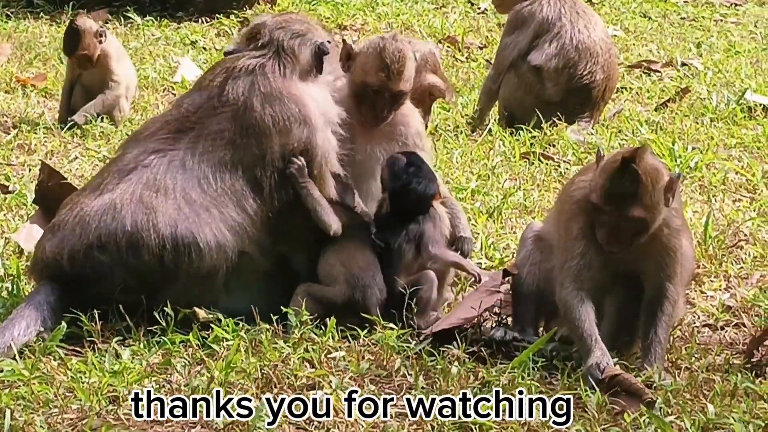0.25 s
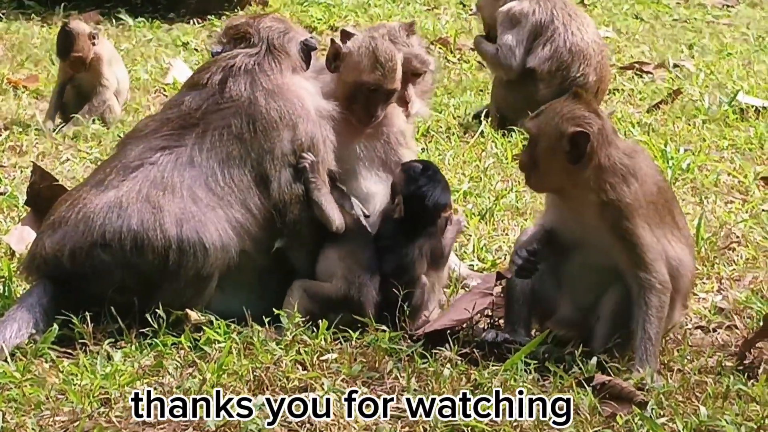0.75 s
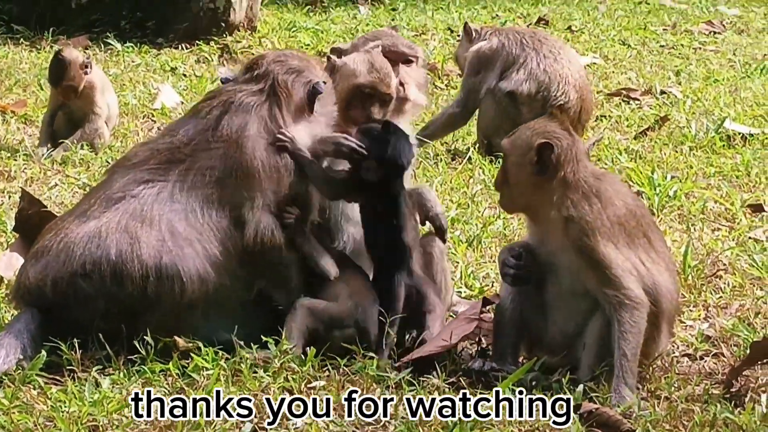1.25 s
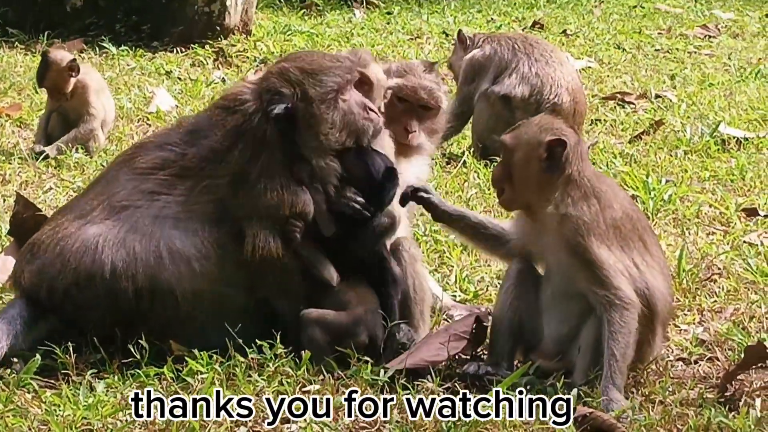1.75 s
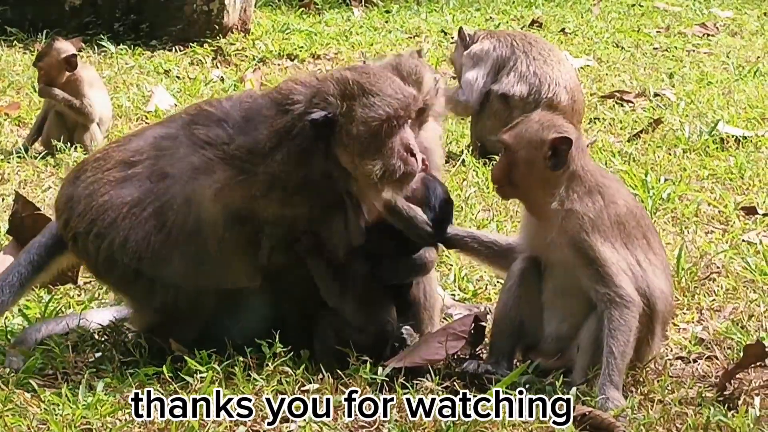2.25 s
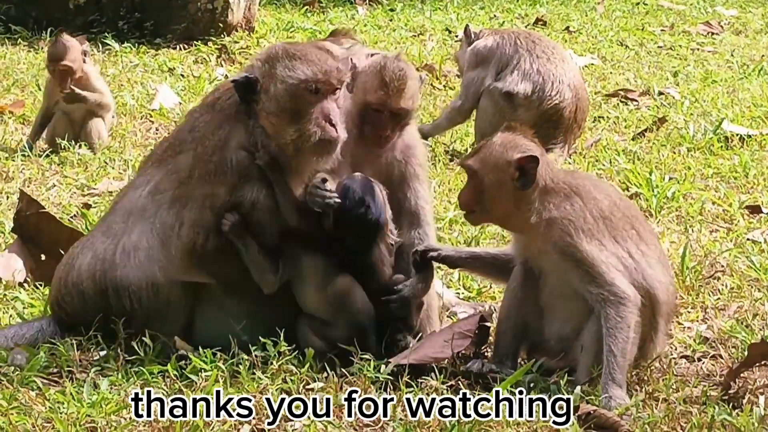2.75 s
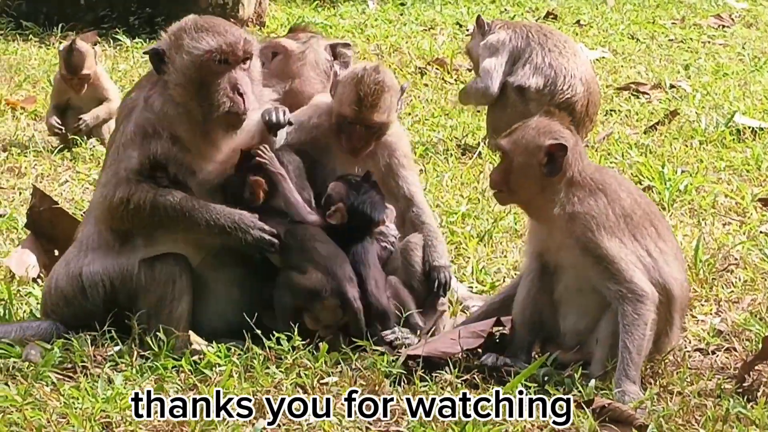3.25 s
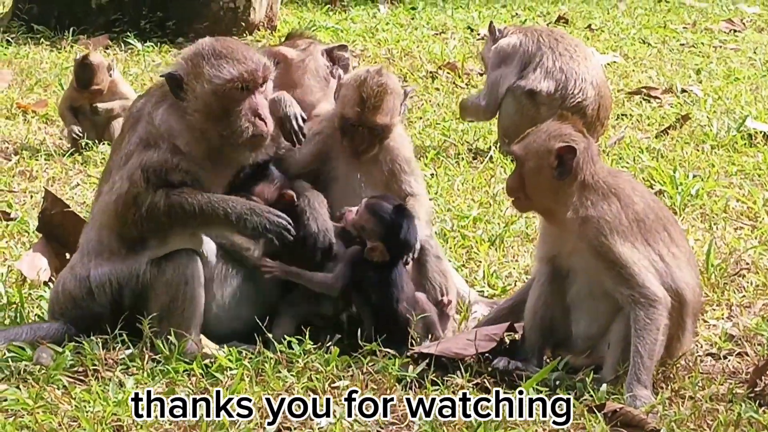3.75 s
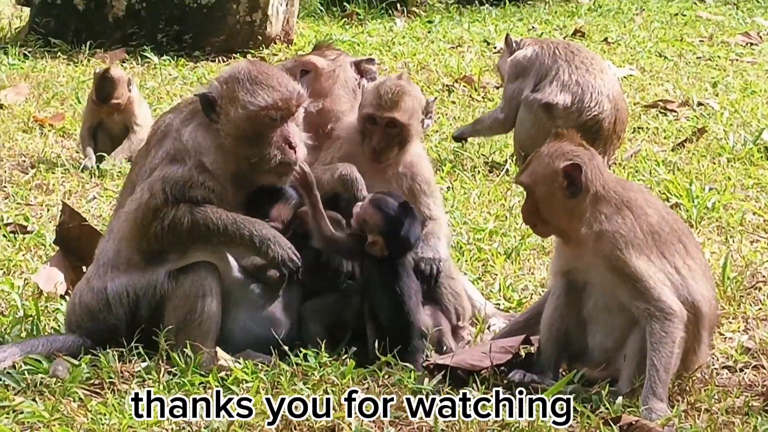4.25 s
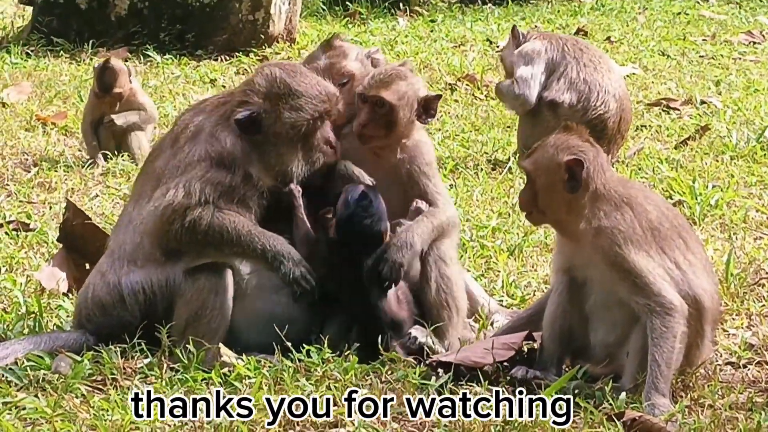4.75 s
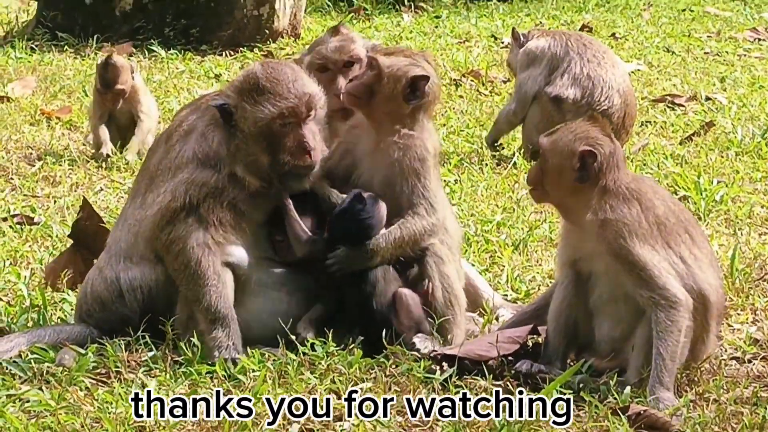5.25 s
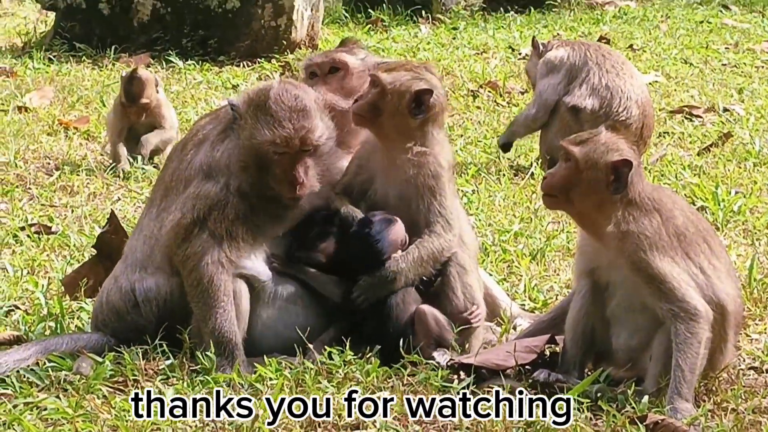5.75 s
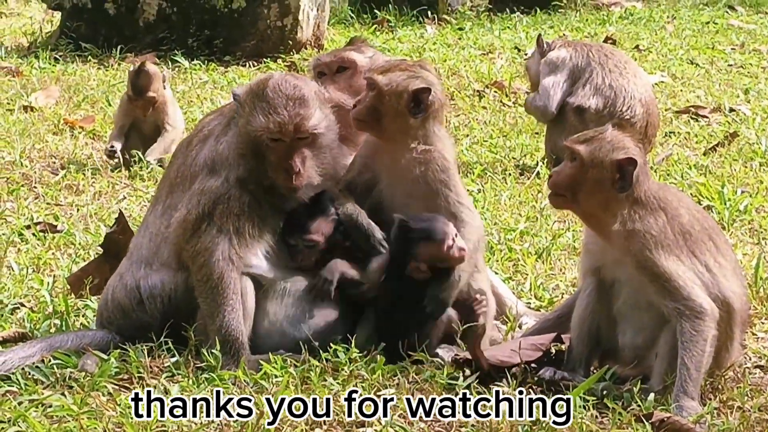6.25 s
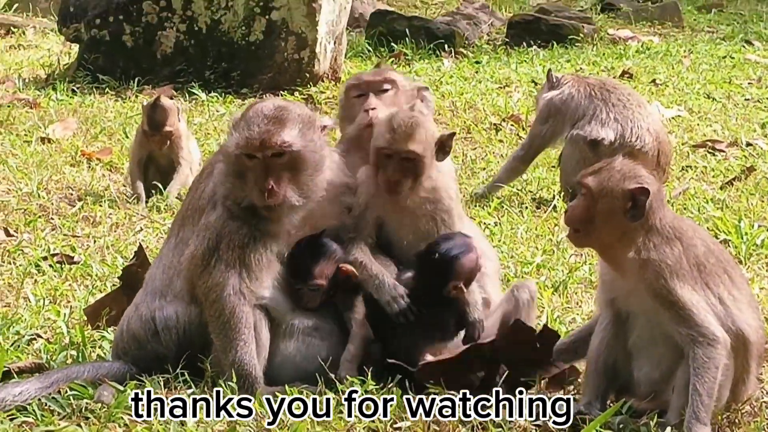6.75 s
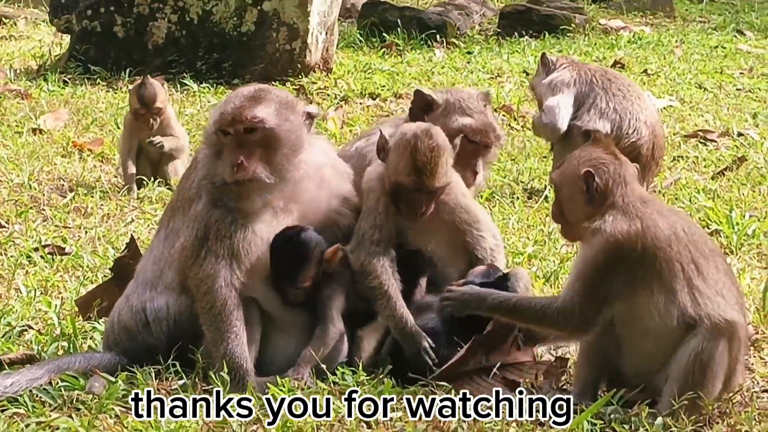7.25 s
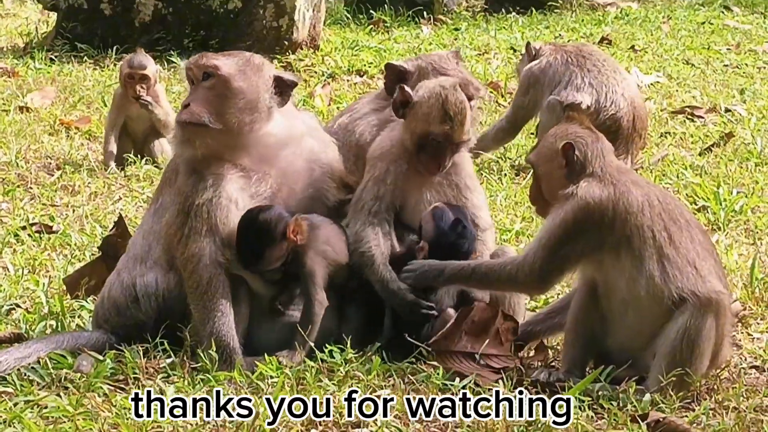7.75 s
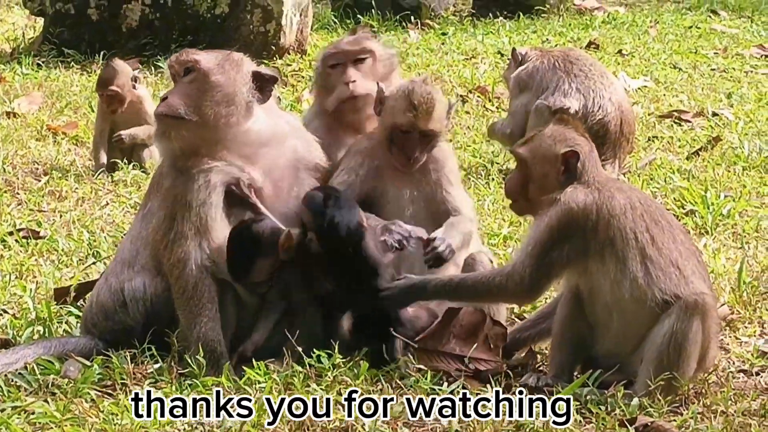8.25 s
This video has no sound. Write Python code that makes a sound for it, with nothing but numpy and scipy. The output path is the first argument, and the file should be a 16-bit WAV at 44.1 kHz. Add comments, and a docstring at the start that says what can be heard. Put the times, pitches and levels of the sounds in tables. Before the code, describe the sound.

Shrill infant monkey chirps and one rasping scream pierce an echoing flurry of bird squawks and chatter, over thin insect drone and low rumble.

```python
"""Shrill infant macaque chirps and one longer rasping scream, over insect drone and low traffic rumble.
Birds squawk, whistle and chatter in echoing trees; lips smack, dry leaves tick and soft bumps land.
The infant's voice mixes vocal-fold tones with rasping noise; the birds are overtones shaped by a beak.
Contact sounds are noise bursts through one resonance; the background is filtered, swaying noise."""
import sys
import numpy as np
from scipy import signal
from scipy.fft import rfft, irfft, next_fast_len
from scipy.io import wavfile

SR = 44100
rng = np.random.default_rng(int(sys.argv[2]) if len(sys.argv) > 2 else 0)


def materialize(psi):
    """Save the field psi as 16-bit PCM at rate SR to the path in sys.argv[1].

    A 1-D psi becomes a single channel; in a 2-D psi each row is a channel.
    """
    bounded = np.clip(np.atleast_2d(psi).T, -1, 1)
    quanta = np.round(bounded * 32767).astype(np.int16)
    wavfile.write(sys.argv[1], SR, quanta)


N = 374836
T = np.arange(N) / SR  # time in seconds
TOP_HZ = 15850  # upper limit of the sound
SECOND_ROUGH = 0.4  # roughness of the infant's second vocal-fold tone

# gain of the right channel for the infant and the taps: [f/Hz, level/dB]
SHADE = [(100, 1.5), (500, -13.5), (2500, -4), (4500, -9), (8000, -5), (9800, -23.5), (11500, -24),
         (14500, -20)]
# the scream, breaking into a whistle an octave up:
# [t/s, pitch f/Hz, tone level/dB, rasp level/dB, second tone level/dB]
SCREAM = [ (6.593, 3400, -40, -32, -55), (6.603, 3890, -18, -26, -50), (6.612, 4020, -27, -31, -48),
          (6.612, 3630, -9.5, -27.5, -42), (6.629, 3600, -11, -17, -32), (6.649, 3330, -29, -20.5, -35),
          (6.667, 3590, -13, -13, -14), (6.683, 3290, -20, -17, -38), (6.706, 3460, -34.5, -30, -29),
          (6.727, 3916, -20, -30, -48), (6.742, 3910, -31, -23.5, -42), (6.777, 3990, -32, -21.5, -40),
          (6.821, 4206, -50, -20, -24), (6.854, 9570, -28, -24, -39), (6.888, 8350, -33, -29.5, -50),
          (6.901, 9040, -24.5, -26, -51), (6.923, 8700, -24, -32.5, -45), (6.957, 8900, -32, -39, -44),
          (6.998, 7940, -22, -29.5, -36.5), (7.023, 7660, -39, -42, -37), (7.048, 7450, -46, -32.5, -61),
          (7.063, 7300, -56, -44, -64), ]


def undb(db):
    """Turn decibels into gain."""
    return 10 ** (np.asarray(db) / 20)


def unit(x):
    """Scale to an rms (average strength) of 1."""
    return x / np.sqrt(np.mean(x ** 2) + 1e-20)


def gain_at(hz, points):
    """Read the gain at hz from (Hz, dB) points joined on a log-frequency axis."""
    f, db = np.transpose(points)
    return undb(np.interp(np.log(hz + 1), np.log(f), db))


def colour(x, points):
    """Filter x by a spectrum of (Hz, dB) points."""
    length = x.shape[-1]
    size = next_fast_len(length)
    gain = gain_at(np.fft.rfftfreq(size, 1 / SR), points)
    return irfft(rfft(x, size) * gain, size)[..., :length]


def resonate(x, hz, width):
    """Ring a resonance, applied twice so that its skirts are steep."""
    b, a = signal.iirpeak(min(hz, SR * .45), hz / width, fs=SR)
    once = signal.lfilter(b, a, x + 1e-18)
    return signal.lfilter(b, a, once)


def walk(t, rate):
    """Join random levels by straight lines, rate of them a second."""
    u = (t - t[0]) * rate
    count = int(u[-1]) + 2
    levels = rng.standard_normal(len(t) + 2)[:count]
    return 1.22 * np.interp(u, np.arange(count), levels)  # 1.22 makes up for the smoothing by the lines


def clock(length):
    """Give the sample times over length seconds."""
    return np.arange(int(length * SR)) / SR


def add(track, s, x):
    """Mix x into the track at s seconds."""
    i = int(np.clip(s * SR, 0, N - 1))
    track[i:i + len(x)] += x[:N - i]


def stereo(x, shade, lag=0):
    """Filter the right channel by shade and delay the left one by lag samples."""
    left = np.pad(x, (lag, 0))[:N]
    return np.array([left, colour(x, shade)])


def scatter(x, t60, onset):
    """Diffuse echoes, different in each channel: noise that builds up, then falls 60 dB in t60 seconds."""
    t = T[:int(1.6 * SR)]
    tail = rng.standard_normal((2, len(t))) * undb(-60 * t / t60) * (1 - np.exp(-t / onset))
    tail /= np.sqrt(np.sum(tail ** 2, axis=1, keepdims=True))
    return signal.fftconvolve(x[None], tail, axes=1)[:, :N]


def arch(u, start, top, end, top_at):
    """Curve from start to top and on to end as u goes from 0 to 1."""
    before = np.clip(1 - u / top_at, 0, 1) ** 2
    after = np.clip((u - top_at) / (1 - top_at), 0, 1) ** 2
    return top + (start - top) * before + (end - top) * after


def folds(t, pitch, rough, bursts, jitter=.085, jitter_hz=2000, flutter=.45, flutter_hz=650):
    """Tight vocal folds whistle through the throat; roughness scatters their pitch and level."""
    # resonances of the infant's throat: [f/Hz, relative level/dB]
    throat = [(2400, -27.5), (3700, -16), (4700, 22.5), (5500, 19), (6500, -5), (7500, -12), (8600, -16),
              (9400, -2), (10700, 13.5), (11800, 5), (13000, -7), (14500, -3.5), (16500, -20)]
    shake = walk(t, jitter_hz) + walk(t, flutter_hz)
    phase = 2 * np.pi * np.cumsum(pitch * (1 + jitter * rough * shake)) / SR
    k = np.arange(1, 7)[:, None]  # overtone numbers
    below_top = np.clip((SR * .42 - k * pitch) / 1500, 0, 1)
    partials = gain_at(k * pitch, throat) * below_top
    tone = np.sum(partials * np.sin(k * phase), 0) / np.sqrt(np.sum(partials ** 2, 0) / 2)
    return tone * np.exp(flutter * rough * bursts - (flutter * rough) ** 2)


def cry(t, pitch, tone_db, rasp_db, least_rough, chaos_share=1, burst_hz=650, edge=.002):
    """Tone and rasp together: the more the air rasps, the more chaotic the folds."""
    # spectrum of the rasp: [f/Hz, relative level/dB]
    rasp_colour = [(1200, -10.5), (2000, -17.5), (2900, -13), (3800, -1.5), (4900, 0), (6500, -6.5),
                   (8800, -3), (10300, 9.5), (11200, 6), (12000, 4.5), (13500, 1), (15700, -1.5)]
    chaos_db, chaos_spread_db = 7.5, 10.5  # rasp over tone at which chaos is well under way; how gradually
    patchy_db, patchy_hz = 6, 110  # flicker of each narrow band
    shudder_db, shudder_hz = 1.5, 220  # the voice shakes in quick uneven bursts
    rasp_flutter = 0.15  # the rasp flutters as a whole

    excess = (chaos_db + tone_db - rasp_db) / chaos_spread_db
    rough = np.clip(least_rough + chaos_share / (2 + np.exp(excess)), 0, 1)
    bursts = walk(t, burst_hz)
    # chaotic folds dwell briefly on one frequency after another
    chaos = np.zeros(len(t))
    for hz in np.arange(1500, 16500, 400):
        band = resonate(rng.standard_normal(len(t)), hz, 630)
        chaos += band * undb(patchy_db * walk(t, patchy_hz))
    rasp = unit(colour(chaos, rasp_colour) * np.exp(rasp_flutter * bursts))
    shudder = unit(undb(shudder_db * np.minimum(walk(t, shudder_hz), .5)))
    fade = np.clip(np.minimum(t, t[-1] - t) / edge, 0, 1) * shudder
    return fade * (folds(t, pitch, rough, bursts) * undb(tone_db) + rasp * undb(rasp_db))


def chirp(length, top_hz, landing_hz, tone_db, rasp_db, landing_db, second_db, second_hz=4750):
    """One arch of pitch: clear at first, then rasping over a second tone, with a flare as it lands."""
    start, top_at, least_rough = .87, 0.25, 0.1  # share of the top pitch; share of the length; roughness
    attack_s, landing_s, release_db_per_s = 0.0059, 0.0026, 1700
    # the tone gives way to rasp, which tops at this share of the length
    tone_fade_db, rasp_growth_db, rasp_ease_db, rasp_top_at = 7, 16.5, 5.5, 0.56

    t = clock(length + .02)  # leaves room for the release
    u = np.minimum(t / length, 1)
    pitch = arch(u, start * top_hz, top_hz, landing_hz, top_at)
    attack_db = 20 * np.log10(1 - np.exp(-(t + 1 / SR) / attack_s))
    effort_db = attack_db - release_db_per_s * np.maximum(t - length, 0)
    flare = undb(landing_db) * np.exp(-((t - length) / landing_s) ** 2)
    tone = undb(tone_db + effort_db - tone_fade_db * u) + flare
    rasp = rasp_db + effort_db + arch(u, -rasp_growth_db, 0, -rasp_ease_db, rasp_top_at)
    # the other vocal fold sounds a pitch of its own
    second = folds(t, np.full(len(t), 1. * second_hz), SECOND_ROUGH, walk(t, 740))
    second *= undb(second_db + effort_db) * u
    return cry(t, pitch, 20 * np.log10(tone), rasp, least_rough) + second


def scream():
    """A shriek dissolves into rasp and ends as a sinking whistle that beats with a second tone beneath."""
    coupling_db = 1.5  # strength of the tones made by the two folds together
    s, *columns = np.transpose(SCREAM)
    s = np.sort(s) - s[0]
    t = clock(s[-1])
    pitch, tone_db, rasp_db, second_db = (np.interp(t, s, c) for c in columns)
    # the other vocal fold wavers around 5180 Hz
    second_hz = 5180 * (1 + 0.0263 * walk(t, 33))
    second = folds(t, second_hz, SECOND_ROUGH, walk(t, 370))
    # in the whistle the two folds add combination tones
    whistling = np.clip((pitch - 6500) / 1000, 0, 1)
    beats = np.zeros(len(t))
    for hz in (2 * pitch - second_hz, pitch + second_hz):
        beats += np.sin(2 * np.pi * np.cumsum(hz * (1 + 0.019 * walk(t, 1200))) / SR)
    beats *= whistling * undb(coupling_db + (tone_db + second_db) / 2)
    return cry(t, pitch, tone_db, rasp_db, 0, chaos_share=0.44) + undb(second_db) * second + beats


def infant(near_db=-18, far_db=-28):
    """The cries, with a quick splash off the ground and the group, and a faint tail from the trees."""
    # chirps: [t/s, length/s, top f/Hz, landing f/Hz, tone level/dB, rasp level/dB, landing level/dB,
    # second tone level/dB]; levels before the chirp's own swells and fades
    chirps = [ (0, .008, 5250, 4710, -13, -24, -16, -57), (.017, 0.026, 2386, 2283, -14, -33.5, -45, -52),
              (1.199, .018, 6180, 4120, -42.5, -26.5, -28.5, -37),
              (4.221, 0.013, 5840, 3450, -34, -57, -46, -67),
              (4.394, .018, 6300, 4290, -25, -16.5, -9.5, -28),
              (4.57, 0.074, 8800, 4500, -20.5, -23.5, -26, -40.5),
              (6.44, .044, 7540, 5010, -21.5, -20, -20, -30.5),
              (8.191, .021, 6730, 3994, -24, -29, -29, -29),
              (8.366, 0.048, 7350, 4440, -22.5, -29.5, -51, -35.5), ]
    # the cries carry little bass: [f/Hz, level/dB]
    low_cut = [(600, -24), (2000, 0)]
    x = np.zeros(N)
    for s, *shape in chirps:
        add(x, s, chirp(*shape))
    add(x, SCREAM[0][0], scream())
    x = colour(x, low_cut)
    dull = colour(x, [(5000, 6), (9000, 9), (15000, -15.5)])
    splash = scatter(x, t60=0.079, onset=0.0068) * undb([[near_db], [near_db + 7.5]])
    return stereo(x, SHADE) + splash + undb(far_db) * scatter(dull, t60=0.64, onset=0.0061)


def outdoors(rumble_side_db=-15, air_sway_db=0.75, insect_flicker_db=2.0):
    """Traffic rumble nearly alike in both channels, a soft wash of air and flickering insect drones."""
    # spectrum of the rumble: [f/Hz, relative level/dB]
    rumble = [(15, -49.5), (25, -26), (73, -1.5), (108, 3), (157, -2.5), (210, -12), (261, -18.5),
              (404, -47.5), (450, -40.5), (580, -58), (990, -120)]
    # slow swell of the rumble: [t/s, level/dB]
    rumble_db = [(0.0, -56.5), (3.1, -52.5), (6.55, -57.5), (8.5, -52)]
    # wash of air in the trees: [f/Hz, relative level/dB]
    air_colour = [(150, -14), (300, -6), (600, -2.5), (1200, 1), (2000, -0.5), (3500, -6), (5500, -14),
                  (7600, -10.5), (8800, -27.5), (12000, -25), (16000, -18)]
    # insect drones: [f/Hz, width/Hz, level/dB]
    insects = [(6725, 270, -62.5), (10520, 840, -80)]

    mid, side = (unit(colour(rng.standard_normal(N), rumble)) for _ in range(2))
    rumble_swell = undb(np.interp(T, *np.transpose(rumble_db)))
    out = rumble_swell * (mid + undb(rumble_side_db) * side * np.array([[1], [-1]]))
    # part of the air is the same in both channels
    shared = colour(rng.standard_normal(N), [(300, 7.5), (1200, -12.5)])
    air = rng.standard_normal((2, N)) + shared
    out += unit(colour(air, air_colour)) * undb(-62.5 + air_sway_db * walk(T, 4.3))
    for hz, width, db in insects:
        drone = unit(resonate(rng.standard_normal((2, N)), hz, width))
        out += drone * undb(db + insect_flicker_db * walk(T, 25))
    return out


def taps(echo_db=-19):
    """Short bursts of contact, each a fading noise that rings one resonance."""
    # lip smacks, leaf ticks and soft bumps: [t/s, centre f/Hz, width/Hz, decay/s, peak level/dB]
    contacts = [ (.06, 2820, 250, 0.016, -38), (0.068, 1610, 250, 0.068, -43.5),
                (.072, 505, 139, 0.018, -46.5), (.078, 3900, 596, 0.0045, -28.5),
                (.062, 12100, 5030, 0.015, -27), (0.099, 1208, 99, 0.0026, -29.5),
                (0.192, 340, 106, 0.00066, -34.5), (0.992, 12200, 1400, 0.0064, -45),
                (1.076, 2380, 940, 0.0074, -30), (1.148, 90, 24, 0.061, -37.5),
                (1.215, 504, 90, 0.021, -47), (1.996, 12040, 3000, 0.0042, -41),
                (3.454, 12700, 2930, 0.021, -43.5), (4.408, 526, 98, 0.004, -27.5),
                (5.268, 380, 288, 0.0013, -24.5), (5.28, 700, 201, 0.029, -41),
                (5.298, 13100, 6560, 0.00028, -17), (7.453, 8300, 3000, 0.0073, -39.5),
                (7.569, 64, 30.3, 0.022, -42.5), (8.258, 94.6, 25.3, 0.023, -36.5), ]
    x, t = np.zeros(N), T[:SR // 6]
    for s, hz, width, decay, db in contacts:
        tap = resonate(rng.standard_normal(len(t)) * np.exp(-t / decay), hz, width)
        add(x, s, undb(db) * tap / np.abs(tap).max())
    return stereo(x, SHADE) + undb(echo_db) * scatter(x, t60=0.12, onset=0.011)


def swell(t):
    """A bird's note fades in and out, over 18 ms or a quarter of a shorter note."""
    return np.clip(np.minimum(t, t[-1] - t) / min(t[-1] / 4, 0.018), 0, 1)


def overtones(t, pitch, rough, beak_hz, jitter=0.054, jitter_hz=600, beak_width=650,
              rough_width=1900, soft_db=-19, waver=0.0079):
    """One side of the syrinx (voice box); the beak favours a few overtones, more in a harsh call."""
    # resonances of the birds' throats: [f/Hz, relative level/dB]
    throat = [(900, -11.5), (1150, 10), (1400, -3.5), (1750, 2.5), (2050, 6), (2420, 6.5), (2980, -0.5),
              (3450, 12.5), (4350, 2.5), (5300, -1), (6200, -9), (8000, -9.5), (11000, -26.5)]
    flutter_db = 3.4  # flutter of each overtone
    shake = jitter * rough * walk(t, jitter_hz) + waver * walk(t, 160)
    phase = 2 * np.pi * np.cumsum(pitch * (1 + shake)) / SR
    k = np.arange(1, 11)[:, None]  # overtone numbers
    hz = k * pitch
    beak = 1 + ((hz - beak_hz) / (beak_width + rough_width * rough)) ** 2
    # pure calls lose the overtones well above the beak resonance
    above = np.clip((k * pitch.max() - beak_hz - 400) / 400, 0, 1)
    soft = soft_db * above * max(1 - rough / 0.26, 0)
    # paths through the leaves make each overtone swell and fade on its own
    fading = flutter_db * np.array([walk(t, 60) for _ in k])
    partials = gain_at(hz, throat) / beak * (hz < TOP_HZ) * undb(soft + fading)
    return np.sum(partials * np.sin(k * phase), 0) * np.exp(.5 * rough * walk(t, 400))


def syrinx(t, pitch, rough, beak_hz, second=0.46, soft_db=-22):
    """A bird's note at unit level; roughness makes it stray and brings in a second gliding voice."""
    wander, wander_hz = .04, 34  # share of the pitch at full roughness; turns a second
    # the other side of the syrinx has a glide of its own
    other = pitch * np.linspace(*rng.uniform(.8, 1.15, 2), len(t))
    voices = []
    for hz in (pitch, other):
        strayed = hz * (1 + wander * rough * walk(t, wander_hz))
        voices.append(overtones(t, strayed, rough, beak_hz, soft_db=soft_db))
    first, joined = voices
    return unit((first + min(second * rough, .7) * joined) * swell(t))


def slide(length, hz, glide, db, rough, beak_hz):
    """A note that glides straight through its pitch."""
    t = clock(length)
    return syrinx(t, hz * (1 + glide * (t / length - .5)), rough, beak_hz) * undb(db)


def squawk(length, top_hz, drop, db, rough, beak_hz):
    """A clear call that swoops up, holds, then drops as the beak closes."""
    swoop_per_s = 0.75  # longer calls start lower
    top_at, curve = 0.283, 2.9  # share of the length at the top; how late the sag comes
    rise_db, fade_db = 12.5, 13  # the call grows as it swoops up, then fades
    beak_close = 2.4  # the beak resonance sinks this many times as far as the pitch
    t = clock(length)
    u = t / length
    swoop = np.clip(1 - u / top_at, 0, 1) ** 2
    sag = np.clip((u - top_at) / (1 - top_at), 0, 1) ** curve
    pitch = top_hz * (1 - length * swoop_per_s * swoop - drop * sag)
    note = syrinx(t, pitch, rough, beak_hz * (1 - beak_close * drop * sag))
    return note * undb(db - rise_db * swoop - fade_db * u ** 2)


def flock(start, end, db, beak_hz, count, rough=.31, glide=0.1605):
    """More birds, further off, give short calls that glide either way."""
    x = np.zeros(N)
    for i, (when, pitch, way, beak, long) in enumerate(rng.uniform(-1, 1, (count, 5))):
        s = start + (end - start) * (i + .5 + when / 2) / count
        length = 0.082 * 2 ** (long / 2)
        add(x, s, slide(length, 850 + 120 * pitch, glide * way, db, rough, beak_hz + 1200 * beak))
    return x


def yelp(length, hz, rise, db, gape=0.53):
    """A hoarse call that sags slightly, then flicks upward as the beak opens."""
    dip, curve = 0.03, 2.4  # sag as a share of the pitch; how late the rise comes
    t = clock(length)
    u = t / length
    pitch = hz * (1 - dip * np.sin(np.pi * u) + rise * u ** curve)
    beak_hz = 3043 * (1 + gape * (u - .5))
    return syrinx(t, pitch, 0.2965, beak_hz, second=1.0, soft_db=-7.0) * undb(db)


def scold(length, hz, db, rough):
    """A falling note whose pitch is shaken into a harsh band."""
    t = clock(length)
    pitch = hz * (1 - 0.1153 * (t / length - .5))  # falls by this share
    voice = overtones(t, pitch, rough, beak_hz=2670, jitter=0.121, jitter_hz=1176, rough_width=150)
    return unit(voice * swell(t)) * undb(db)


def birds(direct_db=1.0, near_echo_db=-4):
    """Calls from the trees, blurred by nearby trunks; the clear squawks also ring on from deep in the wood."""
    # All bird levels are before the shared mix and echoes. thin whistles: [t/s, length/s, pitch f/Hz,
    # glide/share of pitch, level/dB]; the first row, at 0.198 s, is a faint lingering tone of the infant's
    # voice, made the same way
    whistles = [ (0.198, 0.37, 4660, 0.036, -64.5), (0.972, 0.0328, 1682, 0.2, -41),
                (1.422, 0.014, 2960, 0.092, -51.5), (2.026, 0.213, 4570, 0.027, -67),
                (2.674, 0.11, 4270, 0.1, -66), (2.755, 0.12, 3380, -0.026, -50.5),
                (3.908, 0.14, 4124, -0.004, -54.5), (4.345, 0.031, 2760, -0.069, -50),
                (7.136, 0.082, 3555, 0.042, -55), (7.467, 0.073, 3355, 0.019, -44),
                (0.796, 0.18, 5560, -0.018, -61.5), (0.918, 0.045, 2380, -0.1, -43.5),
                (1.523, 0.08, 1452, -0.029, -61), (3.895, 0.082, 1404, -0.093, -50.5),
                (7.722, 0.063, 1850, 0.039, -56), (7.927, 0.071, 4310, -0.11, -61),
                (8.063, 0.082, 3975, -0.029, -46.5), (8.31, 0.16, 3017, -0.0061, -57),
                (8.345, 0.13, 1958, -0.12, -47), ]
    # clear arched calls: [t/s, length/s, top f/Hz, final drop/share of pitch, level/dB before swoop and fade,
    # roughness/0-1, beak resonance f/Hz, long echo level/dB]
    squawks = [ (.328, .19, 858.6, 0.15, -34.5, 0.16, 3030, -6),
               (.61, 0.14, 776, 0.16, -47.5, 0.12, 3070, 1.5),
               (0.723, 0.24, 930, 0.17, -37.5, 0.05, 3375, 0.5),
               (.87, 0.13, 816, 0.13, -47, 0.14, 2720, 3.5),
               (2.254, 0.24, 691, 0.057, -58.5, 0.05, 1990, -7),
               (2.458, .15, 696, 0.031, -50.5, 0.15, 2010, -7),
               (2.885, .25, 877, .22, -30.5, 0.12, 3300, -9.5),
               (3.567, .24, 846.4, 0.11, -40, 0, 2930, 2.5), (3.885, 0.22, 696, .12, -45.5, 0.15, 2817, -7),
               (4.79, 0.17, 968, .1, -43, 0.4, 3020, -9), (5.27, 0.082, 975, 0.1, -44.5, 0.23, 3500, -16),
               (5.68, .13, 906, 0.084, -39, 0.28, 2800, -12),
               (5.92, 0.12, 894, 0.059, -43.5, 0.4, 4200, -26),
               (6.29, 0.093, 970, 0.11, -43, 0.43, 3330, -4.5),
               (6.66, .19, 861.5, 0.099, -36, 0.07, 2730, -1),
               (7.355, 0.13, 1276, 0.05, -42, 0.13, 2760, -23),
               (7.617, 0.087, 1083, 0.056, -35.5, 0.13, 3740, -9.5), ]
    # hoarse yelps of the squabble: [t/s, length/s, pitch f/Hz, final rise/share of pitch, level/dB]
    yelps = [ (4.221, 0.11, 907, 0.12, -46.5), (4.426, 0.11, 818, 0.15, -40.5),
             (4.542, 0.1, 817, 0.026, -42.5), (4.632, 0.11, 846, 0.18, -36.5),
             (4.828, 0.17, 821, 0.19, -39), (5.083, 0.12, 821, 0.19, -35.5),
             (5.354, 0.11, 841, 0.28, -36.5), (5.577, 0.12, 817, 0.14, -37.5),
             (5.739, 0.11, 818, 0.13, -40.5), (5.829, .1, 785, 0.14, -41), (6.052, 0.14, 898, 0.11, -41),
             (6.304, 0.12, 799, 0.11, -40.5), (6.537, 0.14, 784, 0.046, -38), (7.442, 0.062, 780, 0.1, -52),
             ]
    # harsh falling scolds: [t/s, length/s, pitch f/Hz, level/dB, roughness/about 0-1]
    scolds = [(4.964, 0.13, 2616, -37.5, 0.78), (5.105, 0.12, 2610, -44, 1.1), (5.2, .15, 2515, -39, 0.76),
              (7.077, 0.12, 2530, -39, 0.34)]
    # colour of the echo from the trees: [f/Hz, level/dB]
    trees = [(1500, -7.5), (2600, -4), (3100, 4.5), (3600, 4.5), (4200, -15.5)]

    squabble = flock(4.4, 6.8, db=-45.5, beak_hz=3150, count=36)
    distant = flock(2.0, 5.6, db=-64, beak_hz=5500, count=18)
    x, deep = squabble + distant, np.zeros(N)
    for s, length, hz, glide, db in whistles:
        add(x, s, slide(length, hz, glide, db, rough=0.16, beak_hz=hz))
    for s, *shape, echo_db in squawks:
        call = squawk(*shape)
        add(x, s, call)
        add(deep, s, call * undb(echo_db))
    for s, *shape in yelps:
        add(x, s, yelp(*shape))
    for s, *shape in scolds:
        add(x, s, scold(*shape))
    near_echo = undb(near_echo_db) * scatter(x, t60=0.41, onset=0.004)
    echo = near_echo + scatter(colour(deep, trees), t60=1.44, onset=0.028)
    # most of the echo comes from the same side as the birds
    front = stereo(undb(direct_db) * x + echo[0], [(500, -7), (8000, -6.5)], lag=20)
    return front + echo[1] * undb([[-14], [-7]])


def scene():
    """Everything on and around the lawn."""
    return infant() + birds() + taps() + outdoors()


def record(dry):
    """A steep low-pass filter cuts the treble above TOP_HZ."""
    return signal.sosfilt(signal.ellip(10, .2, 70, TOP_HZ, fs=SR, output="sos"), dry)


dry = scene()
out = record(dry)
materialize(out)
```